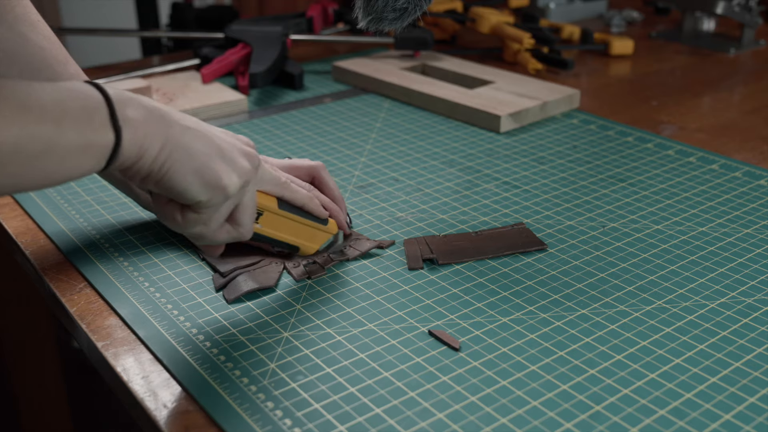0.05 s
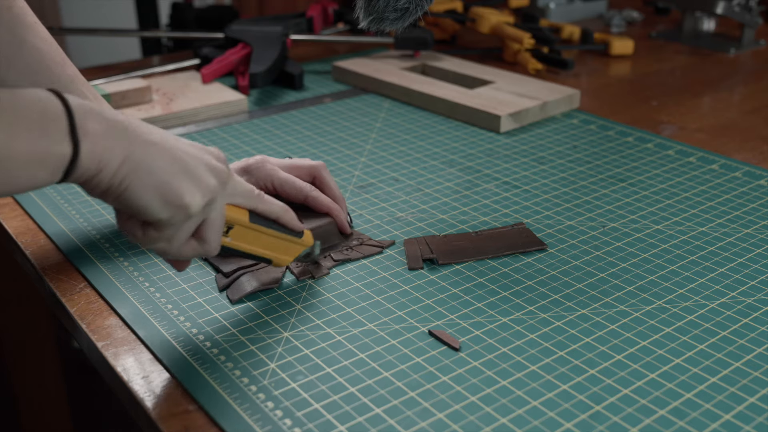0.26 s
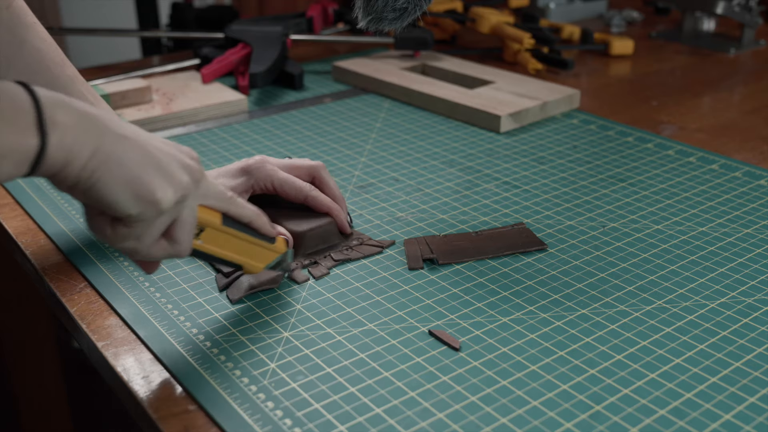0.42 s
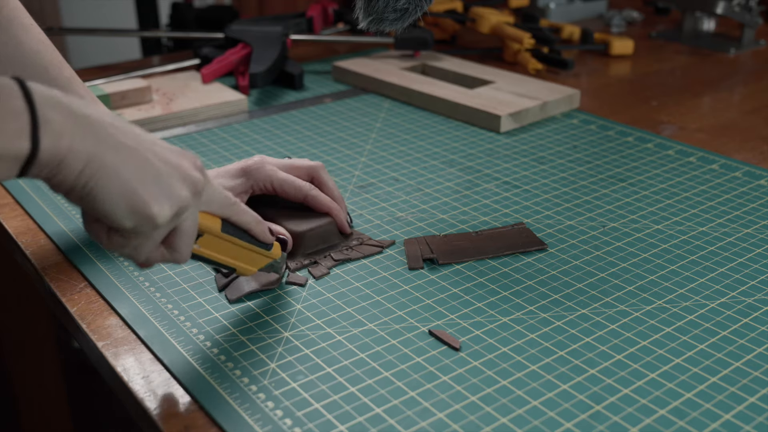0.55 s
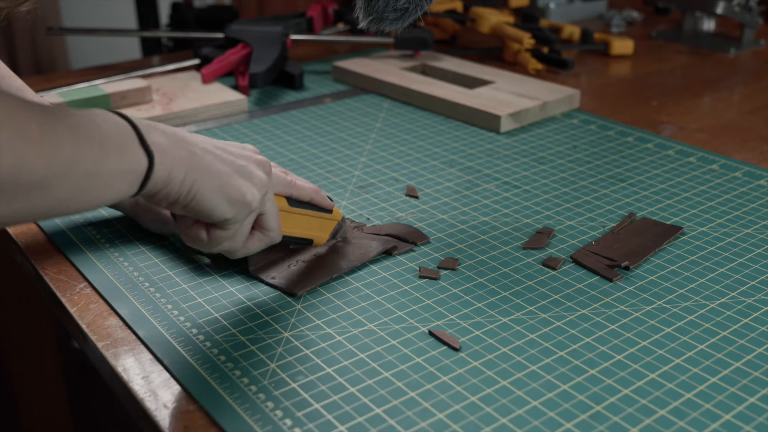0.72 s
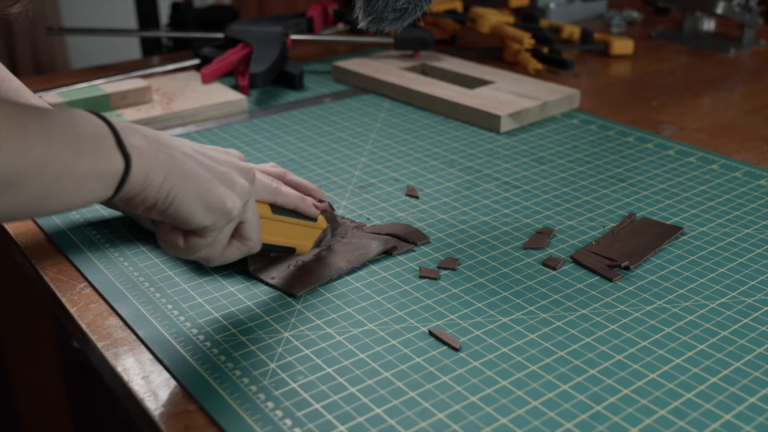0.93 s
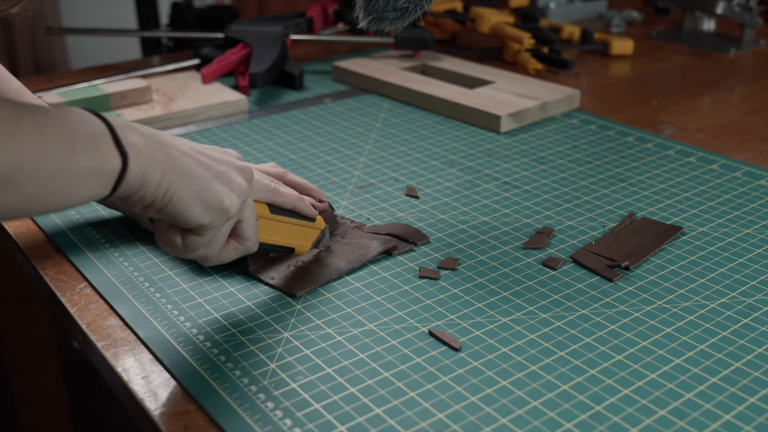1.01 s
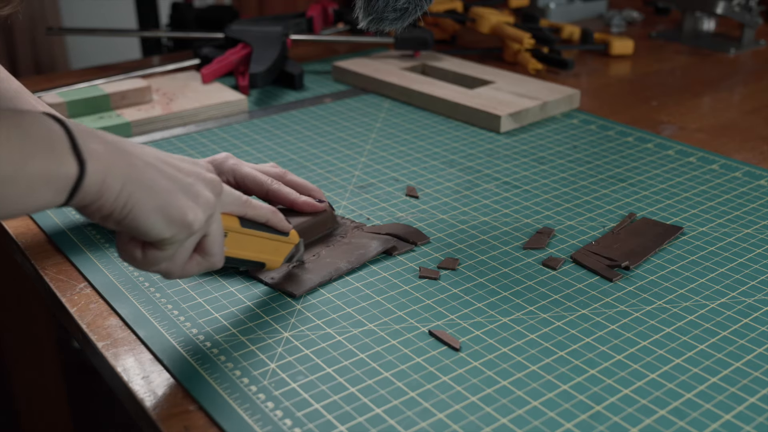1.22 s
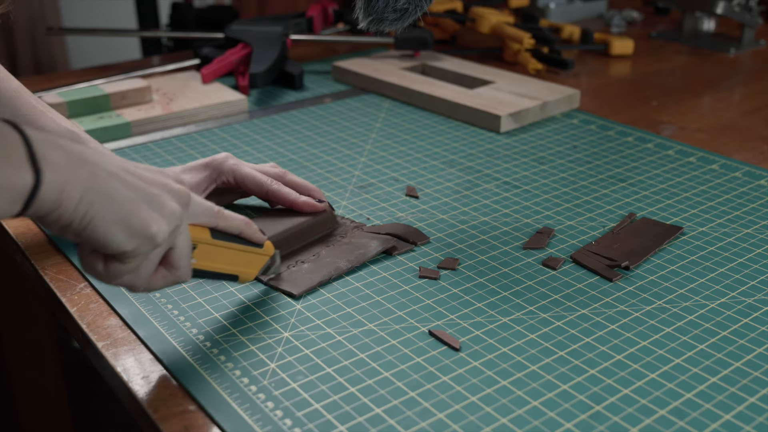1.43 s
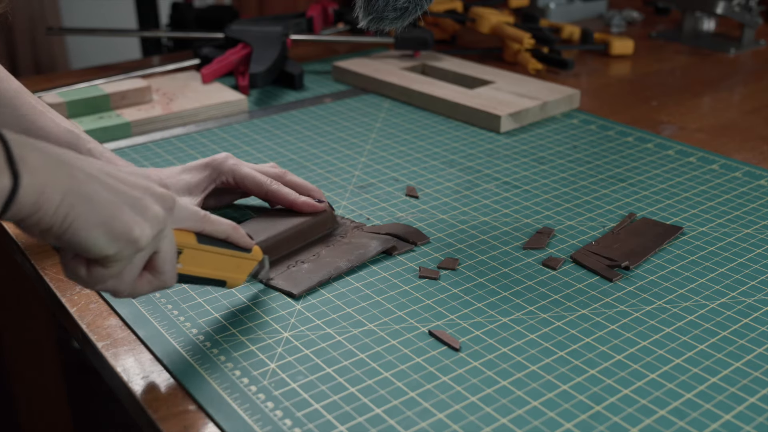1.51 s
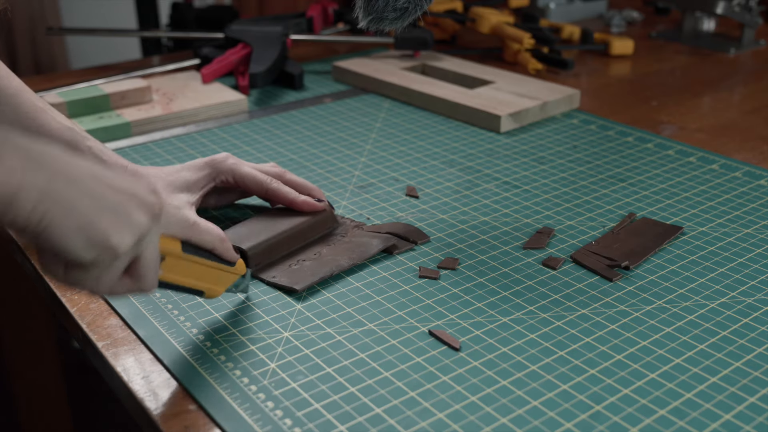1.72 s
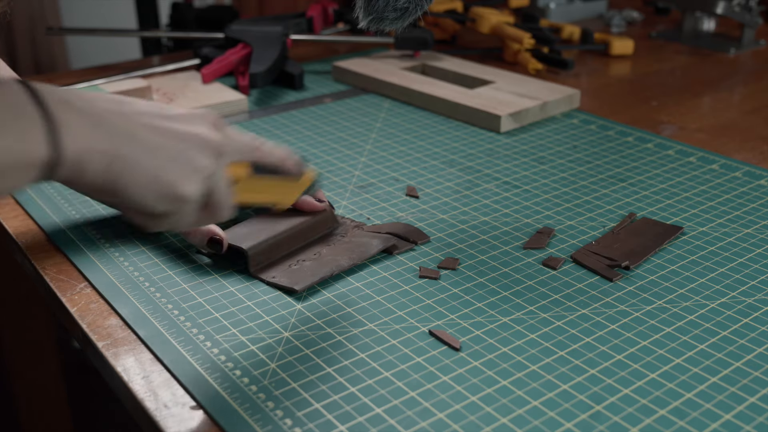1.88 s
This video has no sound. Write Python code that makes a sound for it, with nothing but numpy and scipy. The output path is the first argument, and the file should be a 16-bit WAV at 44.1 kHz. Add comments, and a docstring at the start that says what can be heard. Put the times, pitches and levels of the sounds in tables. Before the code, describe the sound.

A utility knife cuts leather on a cutting mat, heard close in a small, ringing room. Three short, crackling cuts catch and knock on the mat, then a longer one turns raspy and ends in a hard knock.

```python
"""A utility knife cuts leather on a cutting mat, close by on a workbench in a small, ringing room.
Two short cuts come first: fibres part in a dense crackle, the blade catches, tears free and knocks
onto the mat. Near 0.6 s it knocks again and scraps are brushed aside. A third cut runs from 0.8 to 1 s
as the bench rumbles under the hands. The long last cut starts at 1.1 s, turns raspy and ends in a hard
knock at 1.6 s; then leather slides softly and the room dies away."""
import sys
import numpy as np
from scipy import signal
from scipy.fft import rfft, irfft
from scipy.io import wavfile
from scipy.ndimage import uniform_filter1d

SR = 44100
rng = np.random.default_rng(int(sys.argv[2]) if len(sys.argv) > 2 else 0)


def to_wav(s):
    """Save 16-bit WAV."""
    ch = np.atleast_2d(s).T  # columns
    pcm = np.round(np.clip(ch, -1, 1) * 32767)  # PCM
    wavfile.write(sys.argv[1], SR, pcm.astype(np.int16))


N = 85995
T = np.arange(N) / SR
HZ = np.fft.rfftfreq(4096, 1 / SR)  # frequency axis of the EQ curves

# Envelopes, one list per cut: t/s, fibre level/dB, mat level/dB
CUTS = [
    [(.118, -40, -68), (.138, -49, -41.5), (.158, -39, -39), (.175, -50, -43), (.203, -50, -45),
     (.212, -43, -52), (.224, -31, -46), (.233, -41, -25), (.24, -31, -29.5)],
    [(.4, -47, -47), (.425, -48, -45), (.44, -41.5, -45), (.46, -44.5, -43), (.48, -20, -29),
     (.486, -51, -58)],
    [(.802, -41.5, -40), (.826, -33, -32.5), (.842, -40, -37), (.87, -34.5, -32.5), (.92, -42, -34.5),
     (.946, -35, -34.5), (.982, -30.5, -30.5), (.996, -41, -19.5)],
    [(1.09, -62.5, -38), (1.11, -38, -38), (1.13, -26.5, -31), (1.165, -23, -23.5), (1.202, -24, -23),
     (1.228, -27, -27.5), (1.26, -30.5, -35), (1.308, -28, -27), (1.328, -32.5, -32.5), (1.36, -27, -30.5),
     (1.378, -24.5, -29), (1.41, -30, -31), (1.45, -29, -30.5), (1.48, -26, -28), (1.535, -26.5, -27),
     (1.564, -31.5, -32.5), (1.6, -33, -43), (1.613, -16.5, -16)],
]
# EQ of parting fibres: f/Hz, level/dB
FIBRE_EQ = [(100, -52), (500, -10.5), (1100, 2.5), (1450, -2.5), (1900, -1.5), (2400, 0.5), (2850, -7),
            (3500, 4), (5200, 0.5), (6300, -8.5), (7400, -0.5), (10000, -6), (13000, -4.5), (16000, -13.5)]
# Resonances of the knife: f/Hz, width/Hz, level/dB
KNIFE_MODES = [(2414, 160, 5), (3510, 420, -7), (4800, 210, -6), (5060, 290, 1), (7150, 470, 4.5),
               (8760, 150, -7), (10090, 240, 4)]
# EQ of the mat's body: f/Hz, level/dB
MAT_EQ = [(30, -51), (80, -19), (200, -7), (275, -5.5), (335, -5.5), (420, 3), (560, 3.5), (700, -1),
          (980, -1.5), (1250, -8), (1500, -15), (3000, -10), (16000, -53)]
# The mat's resonance glides as the blade travels: t/s, f/Hz
MAT_GLIDE = [(.12, 834), (.48, 850), (.83, 993), (.99, 575), (1.15, 616), (1.2, 575), (1.25, 825),
             (1.31, 854), (1.37, 996), (1.46, 890), (1.53, 970), (1.61, 880)]
# Envelope of the blade's one-pitch rasp, late in the long cut: t/s, level/dB
RASP = [(1.44, -52), (1.476, -28.5), (1.5, -36), (1.535, -34), (1.57, -38.5), (1.605, -31)]
def cutting(grip_db=3.5, grip_s=.04):
    """Fibres part in stick-slip clumps; they ring the knife and drive the mat under the blade."""
    stick_slip = unit_rms(amp(np.clip(wander(0.0015), -2, 2)))
    fibre_envelope = sum(envelope(cut, column=1) for cut in CUTS)
    mat_envelope = sum(envelope(cut, column=2) for cut in CUTS)
    fibres = (crackle() * stick_slip + grit()) * fibre_envelope
    glide_hz = np.interp(T, *np.transpose(MAT_GLIDE))
    mat_ring = resonate(crackle() * stick_slip, glide_hz, width_hz=210)
    mat_body = colour(crackle() * stick_slip, curve(MAT_EQ))
    out = (amp(-0.5) * mat_body + amp(-3) * mat_ring) * mat_envelope
    out += resonate(crackle() * stick_slip + grit(), hz=3450, width_hz=320) * envelope(RASP)
    knife_eq = curve(FIBRE_EQ) + sum(bell(*mode) for mode in KNIFE_MODES)
    for fade in crossfades(5, grip_s):  # the tone drifts with the grip
        ripple = uniform_filter1d(rng.standard_normal(len(HZ)), size=30)
        ripple = unit_rms(uniform_filter1d(ripple, size=20))
        out += colour(fibres * fade, knife_eq + grip_db * ripple)
    return out


def crackle(spread_db=5, fibres_per_s=9000):
    """Tiny snaps of single fibres, a few of them large."""
    sizes = amp(spread_db * np.minimum(rng.exponential(1, N), 4))
    signs = rng.choice([-1, 1], N)
    breaks = rng.random(N) < fibres_per_s / SR
    return unit_rms(sizes * signs * breaks)


def grit(bundles_per_s=110, fall_s=0.0004):
    """Fibre bundles break as sparse, gritty ticks among the fine crackle."""
    breaks = (rng.random(N) < bundles_per_s / SR) * rng.uniform(0.71, 1, N)
    return amp(-7) * unit_rms(rng.standard_normal(N) * decay(breaks, fall_s))


# The blade catches and tears free: peak t/s, level/dB, rise/s, fall/s, tilt/(dB/octave), ring f/Hz
CATCHES = [(0.2336, -9.5, 0.00043, 0.00074, 5, 6400), (0.2369, -17.5, 0.00025, 0.0033, -1, 2650),
           (0.473, -19, 0.0038, 0.0041, -0.5, 4400), (0.4772, -12.5, 0.0013, 0.00216, 2.5, 3800),
           (0.622, -26, 0.0047, 0.004, -3.5, 3150), (0.626, -26.5, 0.0024, 0.0058, 0, 5130),
           (0.821, -22, 0.00064, 0.0076, 0.5, 2320), (0.853, -20.5, 0.0029, 0.0031, -1, 5270),
           (0.903, -26, 0.0073, 0.0088, 1.5, 5200), (.928, -22.5, 0.0061, 0.0082, -0.5, 4940),
           (.958, -27.5, 0.0034, 0.0082, -0.5, 5060), (0.9899, -11.5, 0.0024, 0.0011, 1, 4530),
           (1.196, -24.5, 0.0017, 0.0059, -1, 7160), (1.288, -24.5, 0.00074, 0.0044, -3, 6900),
           (1.304, -21.5, 0.0023, 0.0016, -1.5, 4050), (1.3661, -18, 0.0007, 0.0043, -2, 6100),
           (1.44, -27, 0.00146, 0.011, 3, 8650), (1.474, -21.5, 0.0035, 0.0017, 5, 3600),
           (1.533, -20.5, 0.0034, 0.0012, 6, 3600), (1.6111, -14, 0.00625, 0.00029, 1, 7300)]
# The blade clicks lightly in its holder: t/s, level/dB, tilt/(dB/octave), ring f/Hz
CLICKS = [(0.1347, -27.5, -0.5, 5930), (0.158, -29.5, -3, 3900), (0.1713, -32, 7, 12100),
          (0.2065, -24.5, 3, 12800), (0.2253, -19.5, -1.5, 5070), (0.3054, -17, -4, 2320),
          (0.4384, -31.5, -6, 3600), (0.4558, -32, 7, 3940), (0.7599, -34.5, 8, 10700),
          (.777, -35, -4, 2020)]
# EQ of catches and clicks: f/Hz, level/dB
SNAP_EQ = [(30, -45), (100, -26), (220, -31), (420, -11.5), (1100, 3), (1450, -2.5), (2200, 3),
           (2800, -0.5), (3700, 3.5), (6000, -1.5), (9000, -5), (13000, -6), (16000, -10)]
def snap(at_s, db, rise_s, fall_s, tilt_db, ring_hz):
    """Fibres give way or the blade clicks: a burst swells, falls and rings it. Returns start, sound."""
    lead_s = .04
    t = np.arange(4096) / SR - lead_s
    swell = np.exp(np.minimum(t / rise_s, -t / fall_s))
    burst = rng.choice([-1., 1.], len(t)) * swell
    treble_tilt = tilt_db * np.log2(np.maximum(HZ, 1500))
    eq = curve(SNAP_EQ) + treble_tilt + bell(ring_hz, width_hz=800, db=8)
    return at_s - lead_s, amp(db) * colour(burst, eq)


# The blade hits the mat: t/s, level/dB, centre f/Hz, lag of the lows/s, handle level/dB
KNOCKS = [(.136, -31, 820, .01, -44), (0.2357, -6.5, 880, 0.014, -24), (0.4047, -30, 800, 0.0045, -48),
          (0.4749, -17, 650, 0.018, -19), (.612, -23.5, 2600, 0.00766, -53),
          (.6168, -18, 3220, 0.0051, -46), (0.8531, -18.5, 1900, 0.0031, -40),
          (0.991, -9, 495, 0.00802, -30), (1.1963, -13, 564, 0.0071, -39),
          (1.3658, -14.5, 1100, 0.0061, -32), (1.6131, -5, 570, 0.005, -42)]
# EQ of the hit: f/Hz, level/dB
KNOCK_EQ = [(100, -40.5), (220, -5), (310, -5), (430, 1.5), (600, 0), (900, 4.5), (1300, -4), (1550, -10),
            (3000, -48), (16000, -90.5)]
# Modes of the knife's handle: f/Hz, level/dB, T60/s
HANDLE_MODES = [(842, 0, .085), (1290, -6, .05), (2195, -7, .02), (3675, 1, .03), (3935, -6, .035)]
def knock(at_s, db, centre_hz, lag_s, handle_db):
    """The blow spreads through the mat as a bending wave and rings the handle. Returns start, sound."""
    lead_s, scatter_s = .01, 0.0018
    bend_hz, lowest_bend_hz = 396.9, 310  # lag_s holds at bend_hz; higher notes arrive sooner
    delay_s = lead_s + lag_s * (bend_hz / np.maximum(HZ, lowest_bend_hz)) ** 2.8
    focus_db = -5.5 * np.log2(centre_hz / HZ.clip(lowest_bend_hz)) ** 2
    phase = -2 * np.pi * np.cumsum(delay_s) * HZ[1]
    wave = irfft(amp(curve(KNOCK_EQ) + focus_db) * np.exp(1j * phase))
    wave *= amp(db) / abs(wave).max()
    t = T[:len(wave)]
    edge_echoes = rng.standard_normal(len(t)) * t * np.exp(-t / scatter_s)  # the mat's edges scatter it
    scattered = signal.fftconvolve(wave, edge_echoes)[:len(t)]
    out = wave.std() * unit_rms(unit_rms(wave) + amp(-12) * unit_rms(scattered))
    for hz, mode_db, t60 in HANDLE_MODES:
        ring = np.exp(-np.log(1000) * t / t60) * np.sin(2 * np.pi * hz * t)
        add(out, lead_s, amp(handle_db + mode_db) * ring)
    return at_s - lead_s, out


# Envelope of the sliding leather: t/s, level/dB
SLIDE = [(0, -46), (.04, -45), (.07, -50.5), (.11, -52), (.26, -38.5), (.34, -41), (.38, -48.5),
         (.56, -47.5), (.6, -45), (.648, -40), (.66, -35), (.692, -31.5), (.705, -44), (.79, -49),
         (1.0, -40), (1.66, -51), (1.73, -48.5), (1.79, -52.5), (1.83, -59), (1.95, -65)]
# EQ of leather on the mat: f/Hz, level/dB
SLIDE_EQ = [(100, -22), (200, -1), (300, 3), (450, 9), (850, 6), (1400, -3), (2400, 0.5), (3000, -4),
            (5000, -2), (6500, -9), (9000, -11), (16000, -15)]
def sliding():
    """Leather rubs over the mat under the hand in a fine, even crackle."""
    return colour(crackle(spread_db=1.5) * envelope(SLIDE), curve(SLIDE_EQ))


# The hands push on the bench: t/s, thud level/dB, shudder level/dB
PUSHES = [(0, -72, -56), (.225, -56, -67), (.255, -49.5, -60), (.31, -51, -66), (.35, -64, -64),
          (.63, -60.5, -58.5), (.675, -50, -41.5), (.72, -60, -39.5), (.79, -60, -56), (.855, -45.5, -32),
          (.97, -43, -46), (1.05, -58, -40.5), (1.15, -47, -36.5), (1.21, -55, -41.5), (1.3, -38.5, -42),
          (1.42, -53, -40), (1.5, -45, -37.5), (1.555, -53, -33.5), (1.64, -57, -44), (1.78, -53, -61),
          (1.83, -64, -63)]
# EQ of the deep thud: f/Hz, level/dB
THUD_EQ = [(20, -28), (40, -13), (54, -2), (68, -2), (88, -8), (115, -16), (200, -35), (1000, -60),
           (16000, -80)]
# EQ of the shuddering top: f/Hz, level/dB
SHUDDER_EQ = [(20, -58), (80, -23), (102, 3.5), (116, -3.5), (135, 7), (155, -11.5), (225, -12.5), (277, 0),
              (330, -15.5), (1000, -41.5), (16000, -88.5)]
def bench_rumble():
    """Under the hands the bench thuds deeply and its top shudders."""
    times, thud_db, shudder_db = np.transpose(PUSHES)
    thud = rng.standard_normal(N) * amp(np.interp(T, times, thud_db))
    shudder = rng.standard_normal(N) * amp(np.interp(T, times, shudder_db))
    return colour(thud, curve(THUD_EQ)) + colour(shudder, curve(SHUDDER_EQ))


# Early reflections off the bench and nearby things: delay t/s, level/dB
ECHOES = [(.0047, -18.5), (0.0123, -20.5)]
def room(dry, travel_s=.06):
    """Near reflections, and tails that crossfade as the moving knife meets new echo patterns."""
    wet = np.zeros(N)
    for fade in crossfades(4, travel_s):
        wet += signal.fftconvolve(dry * np.sqrt(fade), room_tail())[:N]
    for delay_s, db in ECHOES:
        add(wet, delay_s, amp(db) * dry)
    return wet


# Reverb decay: f/Hz, T60/s
TAIL_T60 = [(100, 0.96), (450, 0.64), (900, 0.51), (2200, 0.42), (5000, 0.25), (10000, 0.265),
            (16000, 0.094)]
# Reverb EQ: f/Hz, level/dB
TAIL_EQ = [(60, -18), (250, 0.5), (500, -4.5), (900, -6), (1500, -12), (2400, -10), (3800, -15.5),
           (5200, -10), (8000, -17), (16000, -6)]
def room_tail(onset_s=0.0075):
    """Impulse response of a diffuse tail whose treble dies first."""
    hz, t, noise = signal.stft(rng.standard_normal(SR * 3 // 4), SR, nperseg=256)
    rate = np.log(1000) / curve(TAIL_T60, hz)[:, None]
    fade = np.exp(-rate * t) * np.sqrt(2 * rate / SR)  # equal energy in every band
    gain = amp(curve(TAIL_EQ, hz))[:, None]
    taps = signal.istft(noise * fade * gain, SR, nperseg=256)[1]
    return taps * np.minimum(T[:len(taps)] / onset_s, 1) ** 2


# EQ of the background: f/Hz, level/dB
ROOM_TONE_EQ = [(20, -6), (70, 16), (200, -16), (600, 14), (1400, -5), (5000, -21), (16000, -13)]
def room_tone():
    """A faint, steady bed of dark noise."""
    return amp(-58.5) * colour(rng.standard_normal(N), curve(ROOM_TONE_EQ))


def amp(db):
    """Decibels to gain."""
    return 10 ** (np.asarray(db) / 20)


def unit_rms(x):
    """Scales to an rms of one."""
    return x / np.sqrt(np.mean(x ** 2) + 1e-20)


def curve(points, hz=HZ):
    """Joins breakpoints on a log-frequency axis."""
    f, value = np.transpose(points)
    return np.interp(np.log(hz + 1), np.log(f + 1), value)


def envelope(rows, column=1):
    """Gain along dB breakpoints, silent outside them."""
    rows = np.array(rows)
    return amp(np.interp(T, rows[:, 0], rows[:, column], left=-120, right=-120))


def crossfades(count, step_s):
    """Triangular fades that take turns and sum to one."""
    return [np.maximum(1 - abs((T / step_s + k) % count - 1), 0) for k in range(count)]


def add(mix, at_s, sound):
    """Mixes a sound in at a time."""
    part = mix[max(round(at_s * SR), 0):][:len(sound)]
    part += sound[:len(part)]


def bell(hz, width_hz, db):
    """A bell-shaped EQ boost or cut, in dB."""
    return db / (1 + (2 * (HZ - hz) / width_hz) ** 2)


def colour(x, eq_db):
    """Minimum-phase EQ of unit energy."""
    cepstrum = irfft(np.log(amp(eq_db)))
    half = len(cepstrum) // 2
    cepstrum[1:half] *= 2
    cepstrum[half + 1:] = 0
    taps = irfft(np.exp(rfft(cepstrum)))
    return signal.fftconvolve(x, taps / np.linalg.norm(taps))[:len(x)]


def resonate(x, hz, width_hz):
    """A steep resonance that can follow a pitch curve."""
    carrier = np.exp(2j * np.pi * np.cumsum(hz * np.ones(N)) / SR)
    pole = np.exp(-np.pi * width_hz / SR)
    baseband = signal.lfilter([1], np.convolve([1, -pole], [1, -pole]), x / carrier)
    return unit_rms((carrier * baseband).real)


def decay(x, fall_s):
    """Gives every sample an exponential release."""
    return signal.lfilter([1], [1, -np.exp(-1 / (fall_s * SR))], x)


def wander(step_s):
    """Smooth random modulation that changes about every step_s."""
    smoothed = uniform_filter1d(rng.standard_normal(N), int(step_s * SR))
    return unit_rms(decay(smoothed, step_s))


def scene():
    """Cuts, handling, catches, clicks and knocks in the room, over the room tone; mono."""
    dry = cutting() + sliding() + bench_rumble()
    for row in CATCHES:
        add(dry, *snap(*row))
    for at_s, db, tilt_db, ring_hz in CLICKS:
        add(dry, *snap(at_s, db, rise_s=0.00014, fall_s=0.0033, tilt_db=tilt_db, ring_hz=ring_hz))
    for row in KNOCKS:
        add(dry, *knock(*row))
    return (amp(-2) * (dry + room(dry)) + room_tone())[None]


def record(dry):
    """A steep low-pass trims the highest treble."""
    lowpass = signal.firwin(511, cutoff=15950, window=("kaiser", 9), fs=SR)
    return signal.oaconvolve(dry, lowpass[None], "same")


dry = scene()
out = record(dry)
to_wav(out)
```